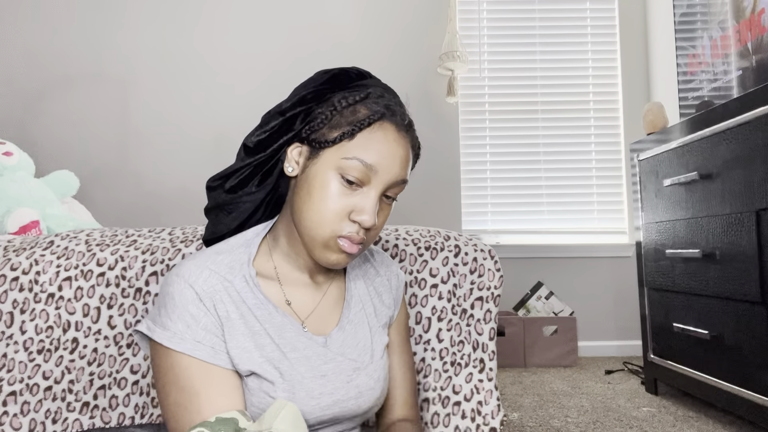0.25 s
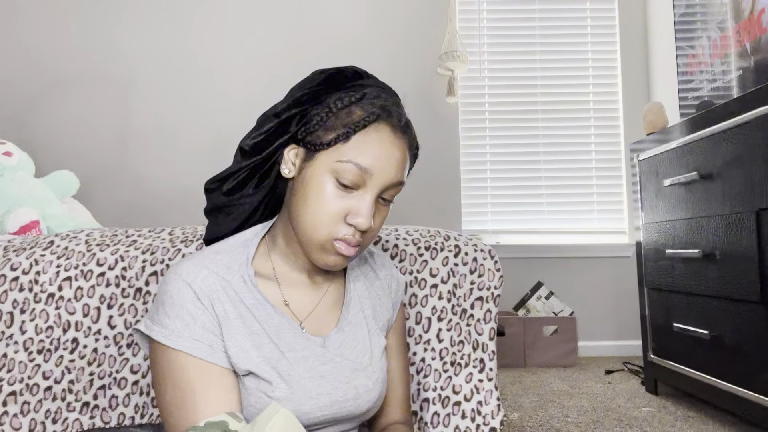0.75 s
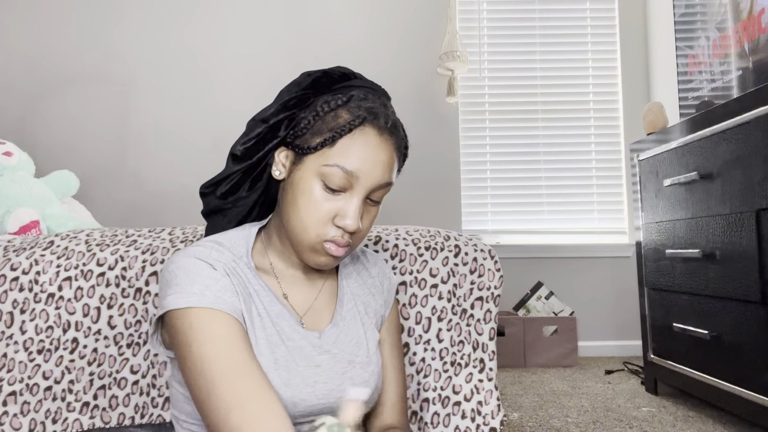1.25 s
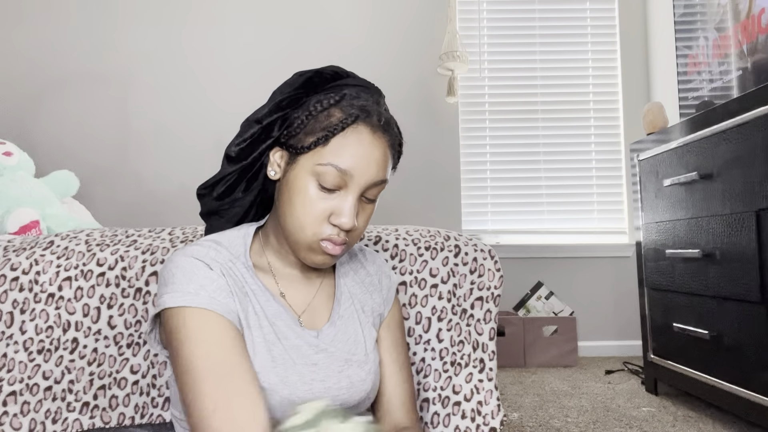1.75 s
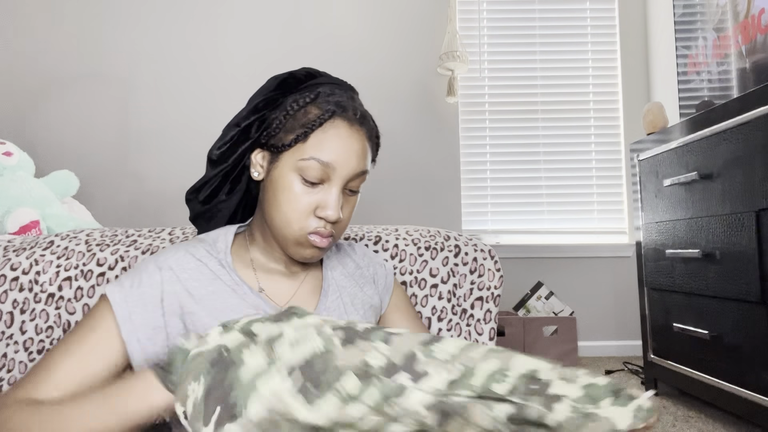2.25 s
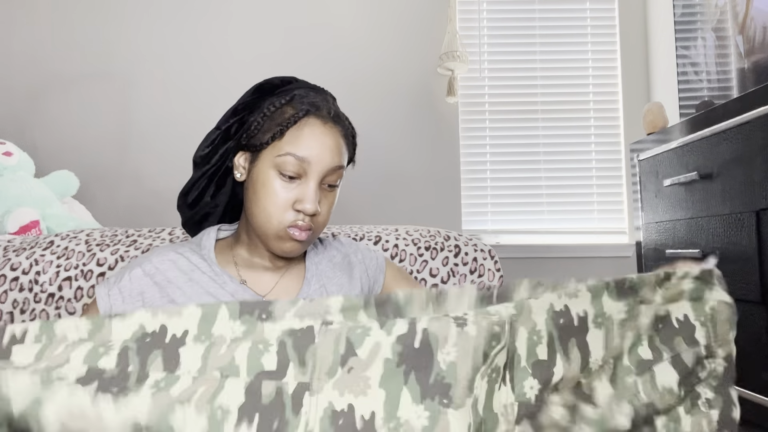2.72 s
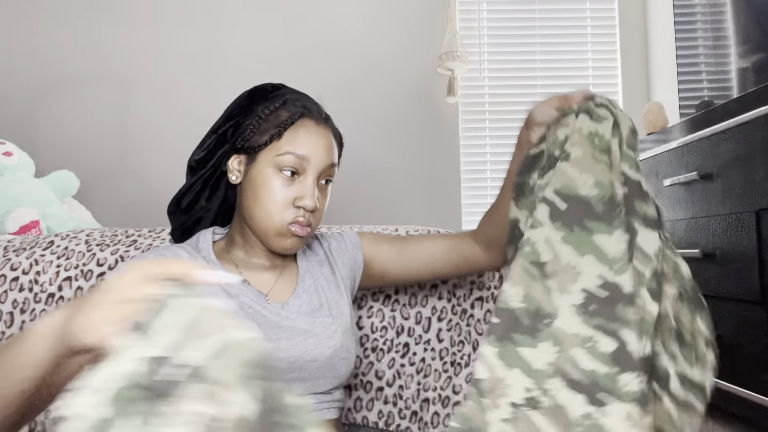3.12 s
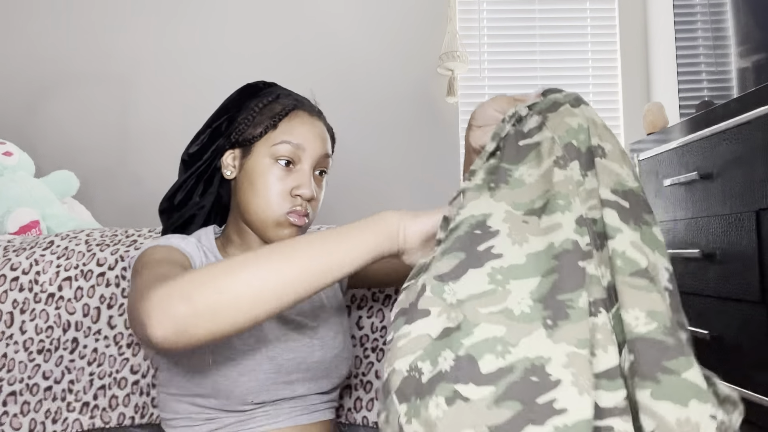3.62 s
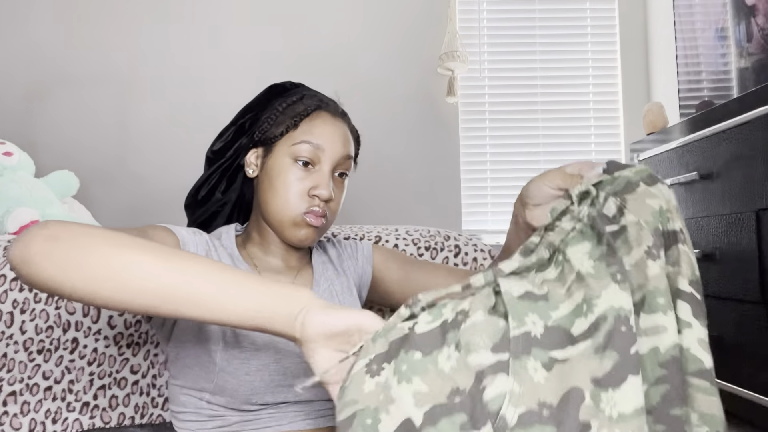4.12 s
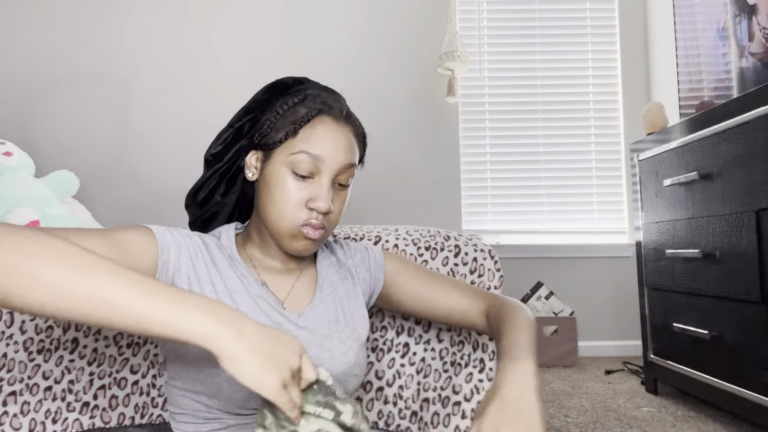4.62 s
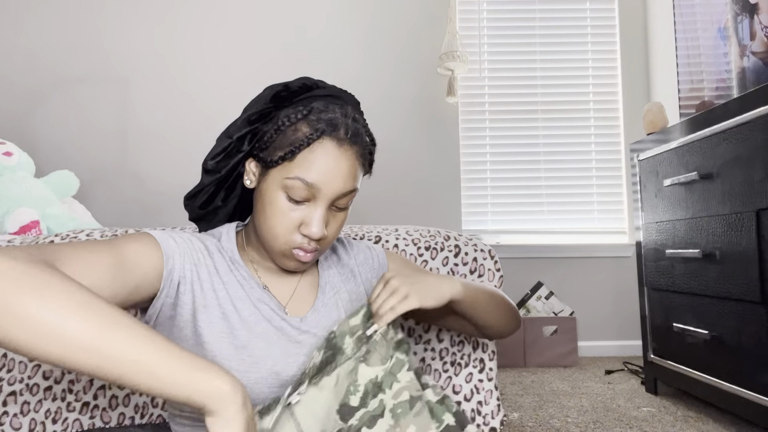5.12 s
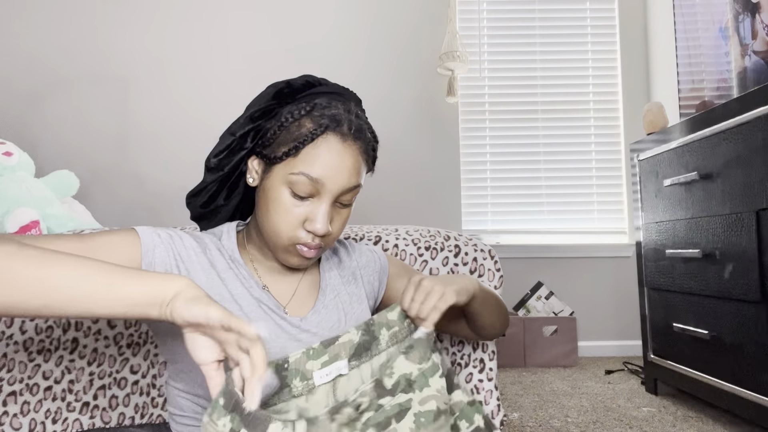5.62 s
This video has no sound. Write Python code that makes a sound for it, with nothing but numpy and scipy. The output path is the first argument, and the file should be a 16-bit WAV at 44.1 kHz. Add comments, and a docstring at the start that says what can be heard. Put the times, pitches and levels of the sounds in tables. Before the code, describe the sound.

Over the steady low hum and soft air of a bedroom, stiff fabric rustles gently right by the microphone. The trousers are then shaken out, giving a loud cluster of snaps, flaps and low puffs. Quieter handling follows, with scattered crinkles, softer swings of the cloth and a few tiny clicks of a nail on a button. The carpeted room has almost no echo.

```python
"""Cloth brushes and rustles close to a phone's microphone: stiff trousers are being unfolded, shaken out
and turned over by hand in a carpeted bedroom. The weave catches and slips, creases crumple and snap,
and the swung panels thump the air, loudest in the shake two to three seconds in. Fingernails tick on a
button and something whistles faintly. Farther off, two house motors drone and beat over mains hum
and the soft air of the room."""
import sys
import numpy as np
from scipy import signal
from scipy.fft import rfft, irfft
from scipy.io import wavfile
from scipy.ndimage import uniform_filter1d

SR = 44100
rng = np.random.default_rng(int(sys.argv[2]) if len(sys.argv) > 2 else 0)


def persist_wave(psi):
    """Save psi, clipped to +-1, as 16-bit WAV."""
    counts = np.round(np.clip(psi, -1, 1) * 32767).astype(np.int16)
    wavfile.write(sys.argv[1], SR, np.atleast_2d(counts).T)


N = 258867
T = np.arange(N) / SR
HZ = np.maximum(np.arange(N // 2 + 1) * SR / N, 1)

# Hand strokes, close up. Each row: start in seconds, hold in seconds, then the levels in dB of
# the four cloth layers: brushing, swish, fibres, crumpling.
STROKES = [(0, 0.0086, -64, -67.5, -65.5, -59.5), (.05, .06, -74.5, -73, -71.5, -72),
           (.15, 0.037, -67.5, -68, -65.5, -66.5), (.22, .05, -75, -77.5, -74.5, -72),
           (.4, 0.024, -72, -77, -77, -74), (.445, 0.0087, -67.5, -70, -66, -63),
           (.63, .04, -84.5, -79, -83, -71), (.69, 0.086, -76.5, -78, -75, -67),
           (.82, 0.071, -77, -80, -79, -69.5), (.9, 0.15, -81, -84, -80.5, -73),
           (1.08, 0.19, -75, -78, -79.5, -71), (1.39, 0.093, -71, -78, -78.5, -65.5),
           (1.55, 0.097, -69, -71.5, -71, -63), (1.74, 0.085, -68.5, -76, -73, -63),
           (1.86, 0.11, -63, -67.5, -65, -52.5), (1.99, 0.23, -59, -62, -61, -52),
           (2.27, 0.085, -52.5, -60.5, -60, -49), (2.37, 0.057, -69, -62, -57.5, -55),
           (2.47, 0.05, -80, -73, -75, -76), (2.55, .04, -78, -64.5, -60.5, -60.5),
           (2.6, 0.041, -60, -56, -58.5, -51.5), (2.655, 0.023, -72, -59.5, -60, -42.5),
           (2.8, 0.23, -75.5, -78, -79, -70.5), (3.13, 0.027, -71.5, -72.5, -73, -65.5),
           (3.155, 0.012, -74, -80, -85, -72), (3.38, 0.018, -71, -70.5, -71, -63),
           (3.44, 0.016, -79, -70.5, -68.5, -61.5), (3.71, 0.022, -75, -81, -94, -59),
           (4.14, 0.25, -80, -78.5, -77, -77), (4.235, 0.055, -76.5, -88, -84, -63),
           (4.405, 0.057, -69.5, -71.5, -73, -57.5), (4.49, 0.19, -74, -77, -76.5, -69),
           (4.7, 0.029, -73, -78, -74, -66), (4.85, 0.12, -70.5, -74, -73.5, -65),
           (5.0, 0.066, -70.5, -72.5, -70, -68), (5.12, 0.095, -78, -80.5, -79, -68.5),
           (5.26, 0.074, -73.5, -77, -78.5, -62.5), (5.39, 0.019, -74, -76.5, -76, -59),
           (5.54, 0.063, -72, -71.5, -71, -64), (5.67, .02, -73, -75.5, -72.5, -70),
           (5.8, 0.085, -73, -75.5, -73.5, -62)]
# The same four layers: level in dB while the cloth only hangs, and pan in dB, left minus right.
HANGING_DB = [-92.5, -97, -87, -77]
LAYER_PAN_DB = [0, -5.5, 5.5, -0.5]
# Colours of those layers and of the panels' thump. Each row: frequency in Hz, relative density in dB.
BRUSH_SPECTRUM = [(1060, -18), (1800, -8), (2510, -8.5), (3160, -13.5), (4200, -36), (6000, -56),
                  (14300, -120)]
SWISH_SPECTRUM = [(1800, -60), (2700, -23), (3430, -7.5), (4600, -8.5), (6500, -13), (8450, -37),
                  (14300, -120)]
FIBRE_SPECTRUM = [(3820, -29), (6500, -5), (9260, -2), (11000, -8.5), (12800, -3), (16600, -14.5),
                  (22000, -120)]
CRUMPLE_SPECTRUM = [(180, -40), (300, -2.5), (486, 0), (749, -5), (939, -2), (1290, -9.5), (1420, -6.5),
                    (1690, -13.5), (3500, -25.5), (4550, -60), (7700, -120)]
THUMP_SPECTRUM = [(35, -27), (60, -5.5), (103, -0.5), (151, -4), (296, -4.5), (366, -13.5), (420, -11.5),
                  (550, -29), (920, -120)]
# Large panels swung through the air. Each row: start in seconds, hold in seconds, level in dB.
SWINGS = [(1.83, 0.15, -56.5), (2.13, 0.13, -46), (2.3, 0.035, -38.5), (2.43, 0.011, -43.5),
          (2.675, 0.016, -33.5), (4.4, 0.092, -52), (5.8, 0.13, -48)]
# Creases letting go. Each row: start in seconds, fold level in dB, fold pitch in Hz, edge level in dB,
# edge base pitch in Hz, crack level in dB, pan in dB (left minus right).
SNAPS = [(0.459, -59, 530, -49.5, 1150, -63, 0), (0.466, -59, 530, -52.5, 1850, -66, 0),
         (0.96, -65, 487, -68, 1050, -84, -7), (1.378, -50, 380, -53.5, 1510, -80, -3),
         (1.398, -58, 400, -60, 1410, -68, -3), (1.83, -37.5, 450, -44, 950, -69, -3),
         (1.864, -42, 486, -62, 1050, -80, -1), (1.956, -35, 376, -42.5, 840, -65, -2),
         (2.106, -41, 500, -46, 1410, -47, -1), (2.17, -35, 550, -38, 1160, -63, -2),
         (2.199, -34, 380, -54, 815, -53, -3), (2.213, -34.5, 430, -55, 940, -70, 0),
         (2.266, -42, 493, -54, 1210, -59, -2), (2.277, -47, 503, -49, 1590, -53, -2),
         (2.29, -32, 410, -36, 1100, -58, 1), (2.305, -34, 474, -33.5, 1070, -49, 4),
         (2.327, -30.5, 470, -32, 1106, -50, 1), (2.342, -25, 506, -42, 1040, -59, 1.5),
         (2.358, -40.5, 368, -40, 890, -50, 10), (2.646, -33, 560, -43, 1150, -65, 9),
         (2.65, -40, 400, -37, 1150, -56, 10), (2.662, -33, 584, -35, 860, -58, 14),
         (2.666, -47, 480, -28, 1006, -56, 8), (2.671, -22, 498, -32.5, 1120, -48, 5),
         (2.676, -34, 390, -37, 856, -65, -7), (2.687, -38, 347, -48, 745, -67, -3),
         (2.699, -33, 457, -59, 1000, -75, -9), (3.127, -52, 430, -44, 940, -69, 0),
         (3.131, -47, 507, -49, 893, -75, -1), (3.441, -45, 490, -63, 980, -80, -15),
         (3.601, -50, 459, -74, 990, -90, -4), (3.684, -48, 448, -56, 990, -77, -5),
         (3.697, -60, 600, -52, 900, -70, -3), (3.714, -62, 600, -54, 1000, -60, -3),
         (4.238, -48.5, 480, -56, 1500, -77, 0), (4.29, -53, 493, -49.5, 780, -70, -8),
         (4.397, -38.5, 490, -45, 980, -70, -5), (4.401, -41, 474, -53, 960, -67, -1),
         (4.407, -46, 426, -49, 1010, -68, -1), (4.847, -42, 540, -48, 815, -75, -4),
         (4.913, -44, 470, -68, 1000, -88, 1), (4.959, -47, 553, -58, 1200, -80, 0),
         (5.017, -64, 590, -49.5, 1040, -68, 3), (5.403, -40, 517, -42, 810, -68, -4),
         (5.408, -51, 487, -48, 850, -68, -6), (5.602, -41.5, 560, -49, 1405, -72, -1),
         (5.67, -49, 447, -48, 965, -65, 1.5), (5.781, -54, 497, -56, 1050, -76, -3),
         (5.795, -39, 520, -50, 800, -66, -3), (5.8, -51, 520, -53, 915, -55, 0)]
# The shaken panel pulling taut. Each row: start in seconds, level in dB, pitch in Hz.
FLAPS = [(2.199, -38, 212), (2.303, -37, 120), (2.333, -38, 65), (2.346, -34, 200), (2.661, -32, 250),
         (2.6763, -25, 240), (2.686, -28, 270), (2.694, -29, 85), (2.707, -35, 100), (4.427, -42, 150)]
# Nails on a button. Each row: start in seconds, level in dB, tilt in dB per octave.
TICKS = [(4.098, -66, -0.5), (4.7165, -78, 13.5), (5.602, -66, 5.5), (5.671, -51, -4.5)]
# The button's modes. Each row: frequency in Hz, relative level in dB, seconds to fall 60 dB.
BUTTON_MODES = [(2420, -0.5, 0.016), (4090, 2, 0.013), (5700, -1.5, 0.0087), (9000, 0.5, .0022),
                (12300, -7, .0015)]
# Faint, thin whistles. Each row: start in seconds, hold in seconds, pitch in Hz, level in dB.
WHISTLES = [(1.09, .02, 2490, -78), (1.135, 0.045, 2536, -76), (1.37, .05, 2780, -80),
            (1.53, .03, 2510, -74), (3.98, .01, 2640, -84), (4.025, .012, 2620, -84)]
# Overtones of the motor drone. Each row: multiple of the lowest tone, level in dB.
DRONE_OVERTONES = [(2, -60.5), (3, -64), (4, -80), (5, -65), (6, -75), (7, -75), (8, -79.5), (10, -73),
                   (14, -79)]
# Room air and distant house noise. Each row: frequency in Hz, relative density in dB.
AIR_SPECTRUM = [(32, -32.5), (55, -0.5), (85, -3.5), (125, -5), (147, -11), (176, -10.5), (231, -13.5),
                (563, -16.5), (757, -29), (951, -32.5), (1680, -45.5), (2300, -40), (2750, -42.5),
                (3100, -48.5), (12800, -60.5), (16600, -84), (22000, -120)]
# How alike left and right arrive at the microphone. Each row: frequency in Hz, correlation (-1 to 1).
STEREO_LIKENESS = [(60, 0.96), (250, 0.013), (600, 0), (1200, 0.52), (2500, 0.29), (7000, 0)]
# Stereo width by frequency. Each row: frequency in Hz, gain of the side signal in dB.
SIDE_GAIN = [(100, -5.5), (300, -7), (600, 1), (8000, 0.5), (8900, -24), (9200, -32), (10900, -40),
             (11200, -11), (12000, -0.5), (15000, 12.5)]


def cloth_rustle():
    """Under the hands, weave and loose fibres catch densely while folds buckle more sparsely."""
    strokes = gestures(STROKES, rise_db_s=222, fall_db_s=218)
    gains = np.hypot(strokes, undb(HANGING_DB)[:, None])
    weave = slips(per_s=2900, spread_db=1.5, fade_s=0.0051)
    brushing = stereo_noise(slips(per_s=900, spread_db=3.5, fade_s=0.0045), BRUSH_SPECTRUM)
    swish = stereo_noise(weave, SWISH_SPECTRUM)
    fibres = stereo_noise(slips(per_s=4500, spread_db=-1.0, fade_s=0.0072), FIBRE_SPECTRUM)
    crumpling = stereo_noise(slips(per_s=300, spread_db=3.0, fade_s=0.0082), CRUMPLE_SPECTRUM)
    layers = (brushing, swish, fibres, crumpling)
    return sum(layer * gain * pan(db) for layer, gain, db in zip(layers, gains, LAYER_PAN_DB))


def panel_thumps():
    """Swung panels push low puffs of air at the microphone."""
    puffs = stereo_noise(slips(per_s=200, spread_db=2.5, fade_s=0.0068), THUMP_SPECTRUM)
    return puffs * gestures(SWINGS, rise_db_s=366, fall_db_s=330)


def crease_snaps():
    """Each crease lets go with a few cycles of the fold, a quicker flick of its edge and a crack."""
    out, t = np.zeros((2, N + SR)), T[:SR // 20]
    fold_shape, edge_shape, crack_shape = (pulse(t / peak_s) for peak_s in (0.0013, 0.0012, 0.0013))
    crack_band = signal.butter(3, [1500, 4600], "bandpass", fs=SR, output="sos")
    hisses = 2 * signal.sosfilt(crack_band, rng.standard_normal((len(SNAPS), 2, len(t))))
    # the fold goes on settling roughly for a moment
    settle_band = signal.butter(2, [450, 1800], "bandpass", fs=SR, output="sos")
    settling = 0.2706 * pulse(t / 0.0043) * signal.sosfilt(settle_band, rng.standard_normal(hisses.shape))
    # the edge's three inharmonic tones start sharp and sag as it slackens
    edge_tones = ((1.1, 0.92), (1.7, 0.31), (2.3, 0.091))  # pitch ratio, amplitude
    sagging_t = t * np.exp(-35.7 * t)
    for snap, hiss, rough in zip(SNAPS, hisses, settling):
        start, fold_db, fold_hz, edge_db, edge_hz, crack_db, pan_db = snap
        fold = undb(fold_db) * (fold_shape * sine(fold_hz * t) + rough)
        flick = sum(share * sine(ratio * edge_hz * sagging_t) for ratio, share in edge_tones)
        edge = undb(edge_db) * edge_shape * flick
        crack = undb(crack_db) * crack_shape * hiss
        i = int(start * SR)
        out[:, i:i + len(t)] += pan(pan_db) * (fold + edge + crack)
    return out[:, :N]


def panel_flaps():
    """The shaken panel pulls taut with dull flaps, each a cycle or two of pushed air."""
    out, t = np.zeros(N + SR), T[:SR // 10]
    cycles_to_peak = 0.51
    for start, db, hz in FLAPS:
        out[int(start * SR):][:len(t)] += undb(db) * pulse(hz * t / cycles_to_peak) * sine(hz * t)
    return out[:N]


def nail_ticks():
    """A fingernail rings the button's modes for a few milliseconds."""
    out, t = np.zeros(N + SR), T[:SR // 20]
    for start, db, tilt_db in TICKS:
        for hz, mode_db, t60 in BUTTON_MODES:
            octaves = np.log2(hz / BUTTON_MODES[0][0])
            envelope = undb(db + mode_db + tilt_db * octaves - 60 * t / t60)
            out[int(start * SR):][:len(t)] += envelope * sine(hz * t)
    return out[:N]


def whistles():
    """A thin, breathy tone comes and goes, wavering and breaking up."""
    wavering_t = np.cumsum(1 + 0.009 * wander(150)) / SR
    flicker = wander(70)
    tones = sum(gestures([(start, hold_s, db)], rise_db_s=500, fall_db_s=500)[0] * sine(hz * wavering_t)
                for start, hold_s, hz, db in WHISTLES)
    return np.sqrt(2) * flicker * tones


def bedroom(direct):
    """The carpeted room adds a short, soft tail, duller than the direct sound and different each side."""
    t = T[:SR // 2]
    t60_s, tail_db, gap_s = 0.18, -11, 0.004
    dull_noise = signal.lfilter([1], [1, -.7], rng.standard_normal((2, len(t))))
    tail = dull_noise * undb(-60 * t / t60_s) * (t > gap_s)
    tail /= np.sqrt(np.sum(tail ** 2, axis=1, keepdims=True))
    return direct + undb(tail_db) * signal.fftconvolve(direct, tail, axes=1)[:, :N]


def house_hum():
    """Two motors drone over mains hum; one runs slightly slower, so the lowest tone beats."""
    motor_hz, beat_s, in_phase_s = 45.68, 2.29, 1.474
    turns = motor_hz * T
    slower_turns = turns - (T - in_phase_s) / beat_s
    drone = undb(-46.5) * sine(turns) + undb(-53) * sine(slower_turns)
    drone *= undb(1.87 * wander(14))  # quick unsteadiness
    for multiple, db in DRONE_OVERTONES:
        drone += undb(db + 0.96 * wander(2.87)) * sine(multiple * turns + rng.random())
    mains = undb(-50) * sine(120.45 * T)  # twice the mains frequency
    return np.sqrt(2) * (drone + mains)


def room_air():
    """The room's air and distant house noise, swelling a little."""
    swell = undb(1.2 * wander(5))
    return undb(-51.5) * stereo_noise(swell, AIR_SPECTRUM)


def slips(per_s, spread_db, fade_s):
    """Stick-slip drive: random releases of unequal size, each dying away quickly."""
    releases = rng.random(N) < per_s / SR
    sizes = undb(spread_db * np.minimum(rng.exponential(size=N), 2.5))
    return signal.lfilter([1], [1, -np.exp(-1 / (fade_s * SR))], releases * sizes)


def gestures(rows, rise_db_s, fall_db_s):
    """Gains that rise to each start, hold and fall, added in power; one curve per level column."""
    power, t = 0, T[::32]
    for start, hold_s, *db in rows:
        shape_db = np.minimum(0, np.minimum(rise_db_s * (t - start), fall_db_s * (start + hold_s - t)))
        power = power + np.outer(undb(db), undb(shape_db)) ** 2
    return np.array([np.interp(T, t, gain) for gain in np.sqrt(power)])


def stereo_noise(drive, spectrum):
    """Two unrelated noises shaped by one drive, coloured and shared between left and right; rms 1."""
    likeness = on_hz(STEREO_LIKENESS)
    mid, side = rfft(drive * rng.standard_normal((2, N))) * undb(on_hz(spectrum))
    mid = irfft(mid * np.sqrt(1 + likeness), N)
    side = irfft(side * np.sqrt(1 - likeness), N)
    return np.array([mid + side, mid - side]) / np.sqrt(np.mean(mid ** 2 + side ** 2))


def wander(per_s):
    """Random steps, smoothed twice; spread near 1."""
    hold = int(SR / per_s)
    steps = np.repeat(rng.standard_normal(N // hold + 1), hold)
    return 1.33 * uniform_filter1d(uniform_filter1d(steps, hold), hold)[:N]


def on_hz(table):
    """A table read at every frequency, straight on a log axis."""
    hz, value = np.transpose(table)
    return np.interp(np.log(HZ), np.log(hz), value)


def pulse(age):
    """An envelope that peaks at 1 when age is 1, then dies away."""
    return age * np.exp(1 - age)


def pan(left_minus_right_db):
    return undb(np.array([[left_minus_right_db], [-left_minus_right_db]]) / 2)


def sine(turns):
    return np.sin(2 * np.pi * turns)


def undb(db):
    return 10 ** (np.asarray(db) / 20)


def scene():
    """The trousers close up in the bedroom, with the house behind them and a little to the right."""
    air = room_air()
    close_up = cloth_rustle() + panel_thumps() + crease_snaps() + panel_flaps() + nail_ticks() + whistles()
    return bedroom(close_up) + (house_hum() + air) * pan(-3)


def record(dry):
    """Stereo width: narrow in the bass, nearly mono at 9-11 kHz, wide above 12 kHz; the top is cut off."""
    mid_lowpass = signal.ellip(10, .2, 60, 12900, fs=SR, output="sos")
    top_lowpass = signal.ellip(10, .2, 70, 15700, fs=SR, output="sos")
    mid = signal.sosfilt(mid_lowpass, dry.mean(axis=0))
    side = irfft(rfft(dry[0] - dry[1]) / 2 * undb(on_hz(SIDE_GAIN)), N)
    return signal.sosfilt(top_lowpass, [mid + side, mid - side])


dry = scene()
out = record(dry)
persist_wave(out)
```